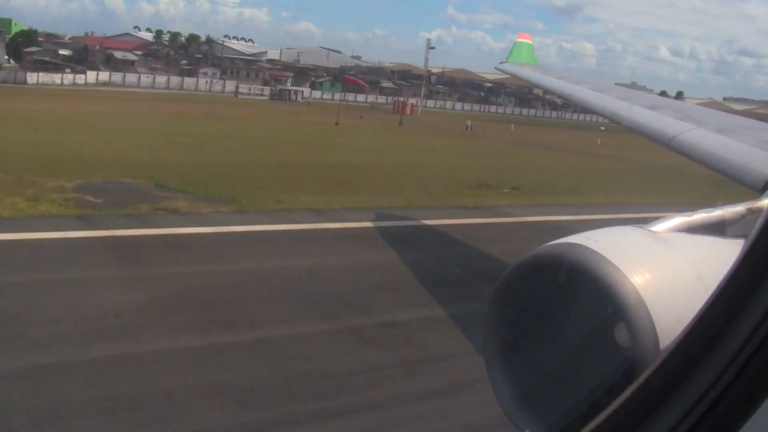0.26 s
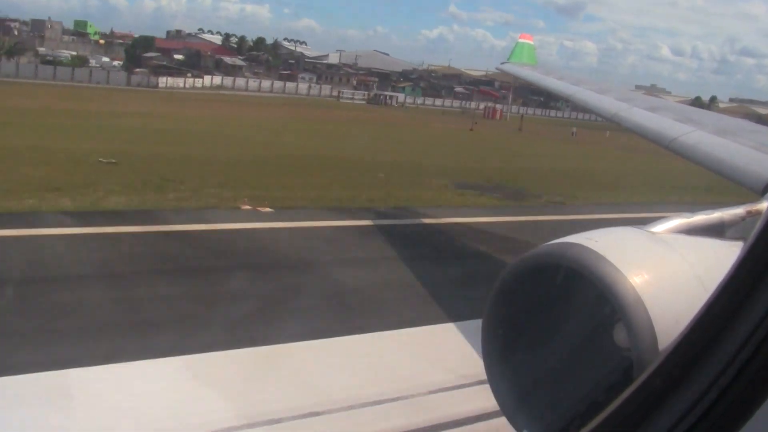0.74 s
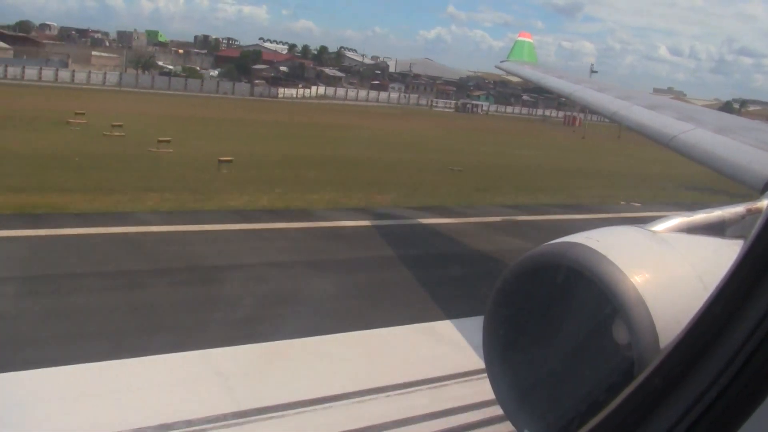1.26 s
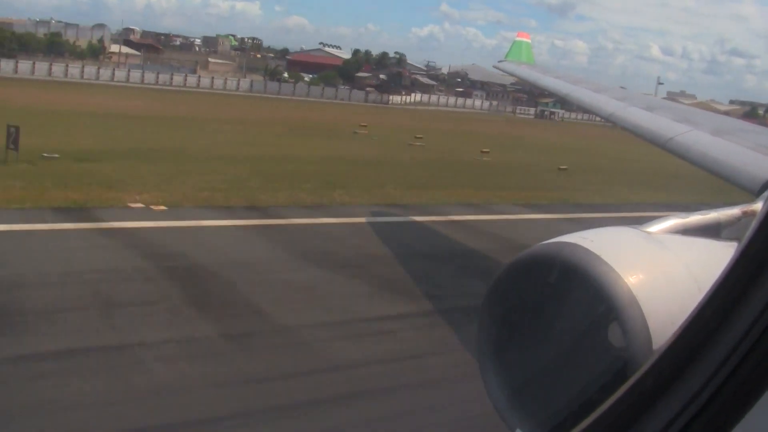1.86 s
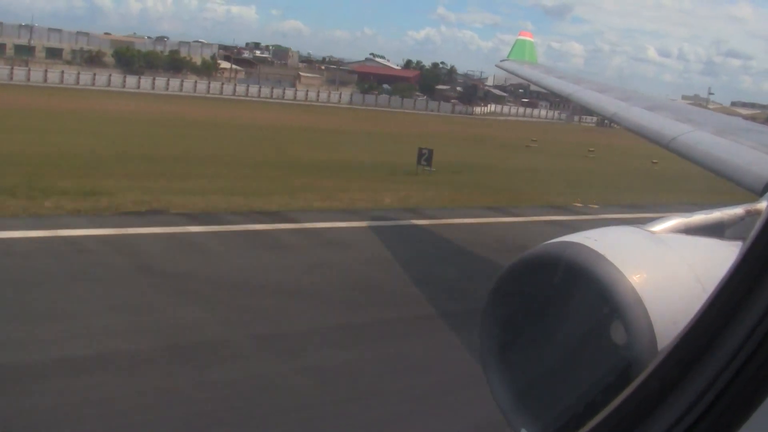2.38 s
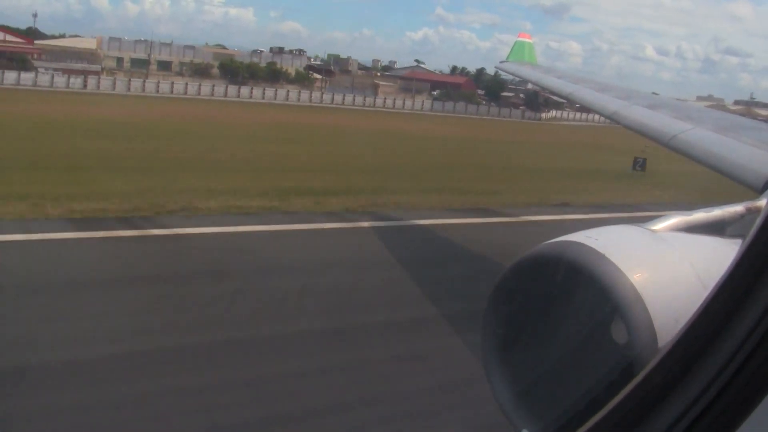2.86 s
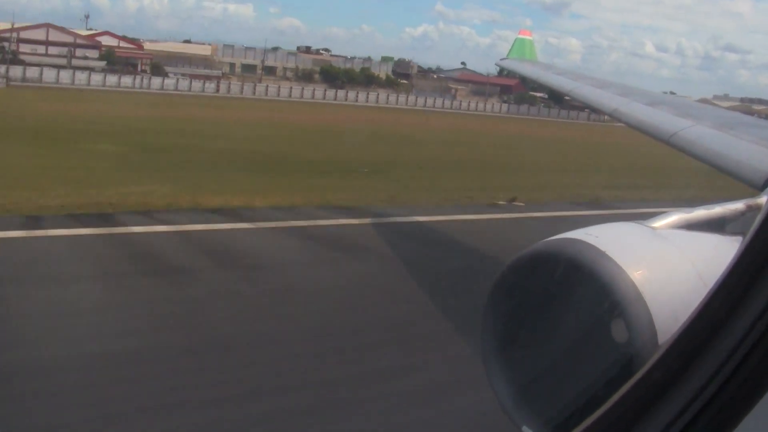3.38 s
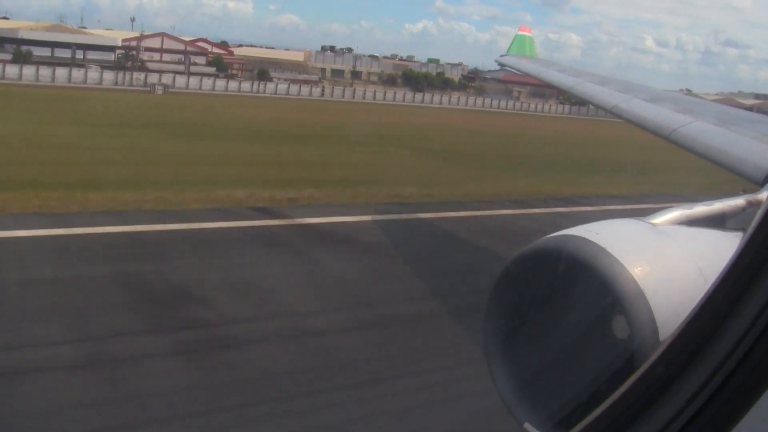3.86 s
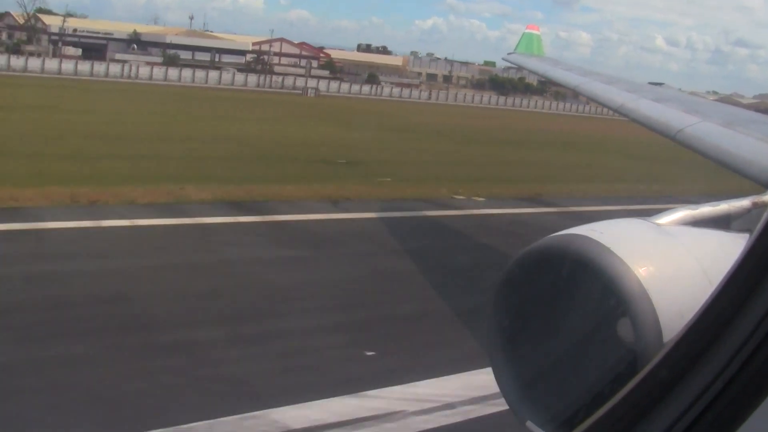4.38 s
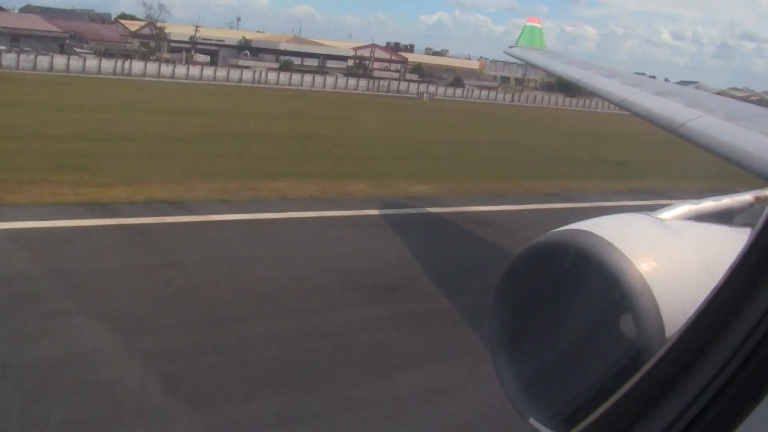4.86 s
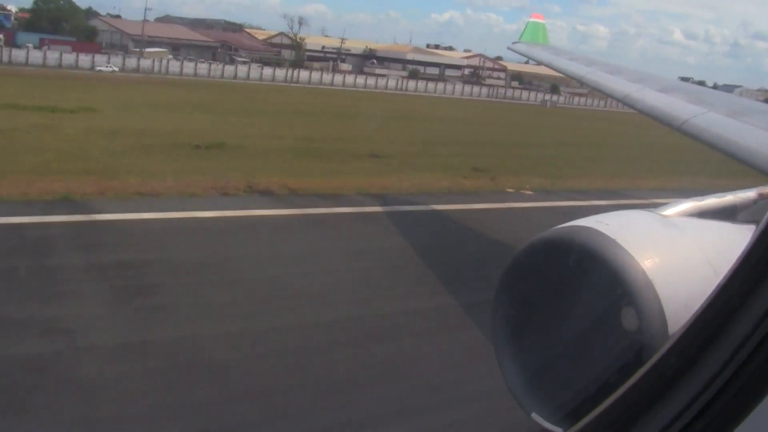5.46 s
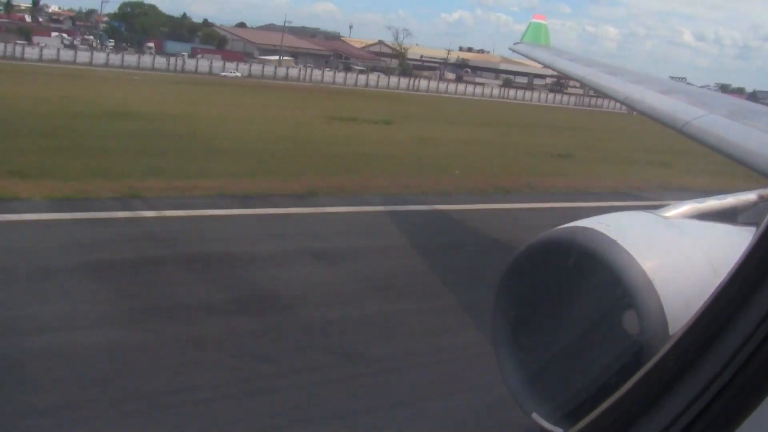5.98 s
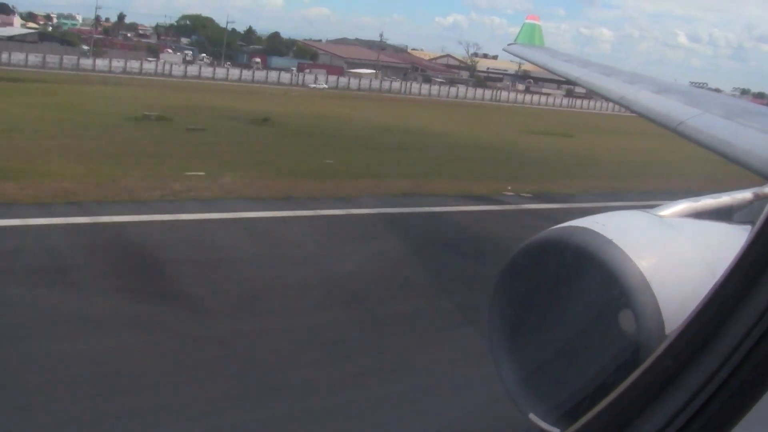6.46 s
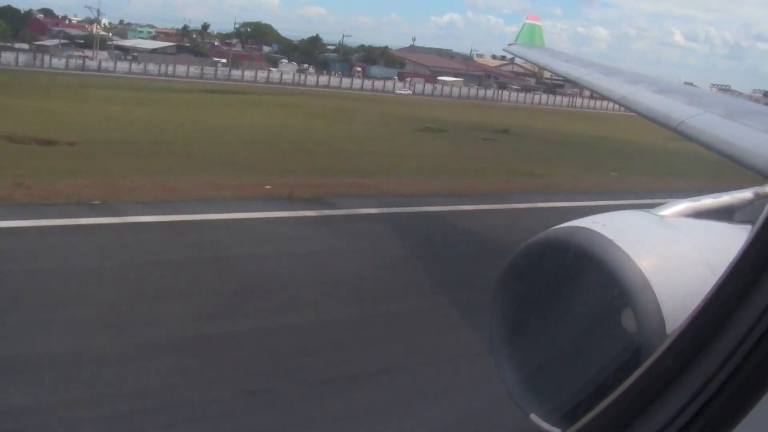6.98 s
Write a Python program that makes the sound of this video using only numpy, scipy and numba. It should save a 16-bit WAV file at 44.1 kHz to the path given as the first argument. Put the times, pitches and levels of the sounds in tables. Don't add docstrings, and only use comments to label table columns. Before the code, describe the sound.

Inside an airliner cabin on its take-off roll, jet engines roar and buzz through the wall while wheels drum and thump over runway bumps.

```python
import sys
import numpy as np
from scipy import signal
from scipy.fft import rfft, irfft, next_fast_len
from scipy.io import wavfile
from scipy.ndimage import uniform_filter1d
from numba import njit

SR = 44100
rng = np.random.default_rng(int(sys.argv[2]) if len(sys.argv) > 2 else 0)


def voltage_ratio(decibels):
    exponent = np.asarray(decibels, float) / 20
    return 10 ** exponent


def put_to_file(sound):
    columns = np.atleast_2d(sound).T
    safe = np.clip(columns, -1, 1)
    whole_steps = np.round(safe * 32767)
    wavfile.write(sys.argv[1], SR, whole_steps.astype(np.int16))


N = 318843
TIME = np.arange(N) / SR
SIZE = next_fast_len(N)
HZ = np.arange(SIZE // 2 + 1) * SR / SIZE

# f/Hz, level/dB
MIC_HISS = [(1000, -13.5), (6000, -2), (10000, -4), (13000, -15.5), (16000, -26.5)]
# f/Hz, level/dB
SIDE_LEVEL = [(25, -26), (60, -38), (110, -36), (200, -30.5), (380, -29), (700, -17), (1290, -20),
              (2200, -16), (3000, -21), (3900, -15), (4600, -31), (6000, -21), (7200, -11), (12000, -8)]
# f/Hz, level/dB, start t/s, end t/s
PUMPS = [
    (812.7, -37, 0, 7.4),
    (554, -28, 0, .7),
]
# t/s, peak level/dB, f/Hz, t60/s
TICKS = [
    (0.153, -49.5, 9500, .03),
    (0.619, -49.5, 10100, .03),
    (2.326, -55, 10040, 0.044),
    (2.748, -52.5, 9800, 0.053),
    (2.76, -46, 5600, 0.048),
    (4.91, -36, 4430, .04),
    (4.924, -44, 9330, 0.019),
    (5.954, -53, 7500, .01),
    (4.025, -66, 10800, .03),
    (0.023, -38, 1960, 0.014),
]
# t/s, peak level/dB, f/Hz, length/s
SQUEAKS = [
    (0.143, -47.5, 6100, 0.068),
    (4.822, -51, 6170, 0.033),
    (5.172, -43.5, 6220, .035),
    (5.692, -42, 6200, .035),
    (6.017, -54, 6000, .025),
]
# t/s, peak level/dB, t60/s
SCRAPES = [
    (4.924, -28.5, .08),
    (5.222, -36, .05),
]
# t/s, engine level/dB, whine level/dB
CABIN = [(0, -2, -34), (.3, 3, -36), (.64, -0.5, -34.5), (.8, 3.5, -32.5), (1.35, 3.5, -30.5),
         (1.7, 3.5, -35.5), (1.9, 1.5, -30.5), (2.3, 1.5, -31.5), (2.6, 1.5, -32.5), (3.3, 2, -31),
         (4.05, 2.5, -31), (4.4, -2, -34.5), (4.95, -1, -44.5), (5.4, -1, -39.5), (5.9, -0.5, -38),
         (6.17, -3, -33.5), (6.7, -1.5, -42.5), (7.0, 1, -30.5)]
# t/s, depth level/dB, length/s
WHINE_FADES = [(.01, 5.5, 0.051), (.35, 7.5, 0.084), (.64, 13, 0.12), (1.2, 6.5, .05), (1.5, 8.5, 0.06),
               (1.69, 7.5, .18), (2.1, 15, 0.061), (2.43, 4.5, .1), (2.7, 5.5, 0.11), (3.04, 3, 0.06),
               (3.43, 5.5, 0.073), (3.67, 10.5, 0.047), (3.74, 9, 0.042), (3.88, 1, .06), (4.47, 5.5, .08),
               (4.71, 12.5, 0.11), (4.97, 9.5, .08), (5.24, 5, 0.13), (5.53, 7, .08), (5.76, 12, .14),
               (5.99, 7, 0.065), (6.29, 13, 0.1), (6.5, 17, 0.072), (6.9, 2, .04), (7.0, 2, 0.036)]
# multiple of the shaft turn, level/dB
BUZZ = [(5, -28.5), (7, -34.5), (16, -63), (21, -49), (22, -56), (25, -57), (26, -52.5), (27, -62.5),
        (29, -49.5), (30, -59.5), (31, -56.5), (32, -67.5), (34, -36), (37, -51.5), (38, -59.5),
        (39, -45.5), (40, -50), (42, -57), (44, -57.5), (45, -74), (46, -60), (47, -59), (59, -66),
        (60, -64.5), (68, -52), (73, -62.5), (102, -63), (136, -73.5)]
# t/s, floor thump level/dB, camera gain drop level/dB
BUMPS = [(.1, 1.5, 1.5), (0.334, 2.5, 3.5), (.575, 0, 2.5), (.842, -1, 4), (1.024, 2, 3), (1.178, 3, 0),
         (1.488, 6, 4), (1.605, 0, 6), (1.675, -1, 3), (2.065, 1, 4.5), (2.417, 1.5, 3.5), (2.526, 3.5, 3),
         (2.631, 3, 2), (2.775, 2, 3.5), (2.911, 0.5, 6), (3.19, 0.5, 5), (3.368, 2, 3), (3.426, 1.5, 4),
         (3.687, 6.5, 6), (3.839, 5, 3), (4.261, -0.5, 2), (4.414, 5, 2.5), (4.677, 10, 8.5), (4.944, 9, 7),
         (5.204, 9.5, 4.5), (5.48, 3.5, 2), (5.708, 5, 5), (5.959, 7.5, 6), (6.205, 9, 5), (6.458, 8, 6.5)]
# t/s, depth level/dB, length/s
LULLS = [(0.647, 13, 0.05), (0.866, 9.6, 0.058), (0.997, 12.5, 0.026), (1.113, 6.5, 0.055),
         (1.33, 14.5, 0.061), (1.692, 8.5, 0.041), (1.757, 5, 0.04), (2.3, 8.5, 0.043), (2.452, 4.5, 0.034),
         (2.743, -2.5, 0.05), (2.937, 12, 0.034), (3.276, 6.5, 0.061), (3.502, 5, 0.028), (3.706, 5, 0.055),
         (3.774, 9.5, 0.064), (3.916, 10.5, 0.05), (4.211, 9, 0.037), (4.38, 2, 0.045), (4.513, 4.5, 0.058),
         (4.8, 10, 0.087), (5.008, 9, 0.037), (5.172, 6.5, 0.017), (5.356, 4, 0.055), (5.42, 6.9, 0.03),
         (5.516, 10.5, 0.04), (6.027, 3.5, 0.055), (6.183, 5, 0.044), (6.3, 7.5, 0.046), (6.546, 2, 0.064),
         (6.857, 4, 0.022)]
# t/s, turns per s
WHEEL_TURNS = [(0, 14.7), (7.23, 19.5)]
# multiple of the wheel turn, level/dB off the floor modes
WHEEL_ORDERS = [(5, -21), (6, -24), (7, -25.5), (8, -25.5)]
# f/Hz, width f/Hz, level/dB
DRUM_MODE = [(115.8, 11.5, 13.5)]
# f/Hz, width f/Hz, level/dB
FLOOR_MODES = [(81.5, 120, -9), (113.7, 16, -7)]
# f/Hz, level/dB per Hz
ROAR = [(12, -63), (20, -28.5), (85, -6.5), (126, -4), (175, -3), (289, -8.5), (746, -25), (811, -25.5),
        (1300, -33.5), (1770, -35.5), (1920, -32), (2470, -45), (5850, -53), (9930, -63), (15500, -92)]
# f/Hz, width f/Hz, level/dB
WALL_MODES = [(226, 13, 4), (2190, 300, -2), (3520, 1000, 3), (5690, 650, 4), (7500, 500, 1)]

SHAFT_HZ, BLADES = 56.23, 34
SCRAPE_HZ = 900, 2600
THUMP_PEAK_S, THUMP_LENGTH_S = 0.022, 0.055
GAIN_DROP_S, GAIN_RECOVER_S = 0.009, 0.11
SHUDDER_SHARE, SHUDDER_S = 0.35, 0.012
HISS_FOLLOWS = 0.65
ROAR_DUCKS, WHINE_DUCKS, FLOOR_DUCKS = 1, 0.52, 0.68
GAIN_FLUTTER_DB, FLOOR_FLUTTER_DB, WHINE_FLUTTER_DB = 1.22, 1.5, 1.6


def level(x, db):
    return x * voltage_ratio(db) / np.sqrt(np.mean(x ** 2))


def curves(table):
    s, *columns = np.transpose(table)
    return [np.interp(TIME, s, c) for c in columns]


def shape(table, hz):
    f, db = np.transpose(table)
    return np.interp(np.log(hz + 1), np.log(f), db)


def resonances(modes, hz):
    return sum(height / (1 + (2 * (hz - f) / width) ** 2) for f, width, height in modes)


def walk(rate):
    hold = max(int(SR / rate), 2)
    steps = np.repeat(rng.standard_normal(N // 20 + 2)[:N // hold + 1], hold)
    return 1.25 * uniform_filter1d(uniform_filter1d(steps, hold), hold)[:N]


def bell(s, length):
    return np.exp(-(2 * (TIME - s) / length) ** 2)


def dips(table):
    return -sum(db * bell(s, length) for s, db, length in table)


def swell(s, rise_s, fall_s):
    return np.exp(np.minimum((TIME - s) / rise_s, (s - TIME) / fall_s))


def pair(mid, side):
    return np.array([mid + side, mid - side])


def noise(db):
    mid, side = (rfft(rng.standard_normal(SIZE)) * voltage_ratio(db) for _ in range(2))
    return mid, side * voltage_ratio(shape(SIDE_LEVEL, HZ))


def heard(mid, side):
    return pair(irfft(mid, SIZE)[:N], irfft(side, SIZE)[:N])


def band_pass(x, order, edges_hz):
    return signal.sosfilt(signal.butter(order, edges_hz, "band", fs=SR, output="sos"), x)


def tone(phase, scatter, rate, side_db):
    turn = np.exp(1j * (phase + 2 * np.pi * rng.random()))
    paths = 1 + scatter * (walk(rate) + 1j * walk(rate))
    stray = voltage_ratio(side_db) * np.exp(1j * 2 * walk(rate / 8))
    return np.sqrt(2 / (1 + 2 * scatter ** 2)) * pair((turn * paths).real, (turn * stray).real)


def mic_hiss():
    spectrum = rfft(rng.standard_normal((2, SIZE))) * voltage_ratio(shape(MIC_HISS, HZ))
    return level(irfft(spectrum, SIZE)[:, :N], -67.0)


def pumps(gain_db):
    out = 0
    for hz, db, start, end in PUMPS:
        running = np.clip(np.minimum(TIME - start + 0.11, end - TIME) / 0.053, 0, 1)
        out = out + voltage_ratio(db + gain_db) * running * tone(2 * np.pi * hz * TIME, 0.19, 4., -19.5)
    return out


def ticks():
    out = np.zeros(N)
    for s, db, hz, t60 in TICKS:
        age = np.clip(TIME - s, 0, None)
        edges = np.minimum([hz * 1.1, hz * 1.2], .45 * SR)
        ring = level(band_pass(rng.standard_normal(N), 2, edges), 0)
        attack = np.minimum(age / 0.00082, 1)
        out += attack * voltage_ratio(db - 60 * age / t60) * ring
    return pair(out, .2 * out)


def squeaks():
    out = np.zeros(N)
    for s, db, hz, length in SQUEAKS:
        phase = 2 * np.pi * hz * np.cumsum(1 + 0.0098 * walk(160)) / SR
        out += voltage_ratio(db) * bell(s, length) * (np.sin(phase) + .05 * np.sin(2 * phase))
    return pair(out, .2 * out)


def scrapes():
    grit = band_pass(rng.standard_normal(N), 1, SCRAPE_HZ)
    grit = level(signal.sosfilt(signal.butter(3, 7000, fs=SR, output="sos"), grit), 0)
    puffs = sum(voltage_ratio(db) * swell(s, .002, t60 / np.log(1000)) for s, db, t60 in SCRAPES)
    out = puffs * grit
    return pair(out, .1 * out)


def fan(whine_db, hiss_db):
    phase = 2 * np.pi * SHAFT_HZ * np.cumsum(1 + 0.000821 * walk(3)) / SR
    out = 0
    for k, db in BUZZ:
        if k == BLADES:
            out = out + voltage_ratio(whine_db - .5) * tone(k * phase, .22, 70., -9)
        else:
            out = out + voltage_ratio(db + hiss_db) * tone(k * phase, .15 + .025 * k, 5 + 1.3 * k, -15)
    return out


def runway():
    thump_db = -dips([(s + THUMP_PEAK_S, db, THUMP_LENGTH_S) for s, db, _ in BUMPS])
    duck_db = 0
    for s, _, db in BUMPS:
        shudder = SHUDDER_SHARE * swell(s, SHUDDER_S, GAIN_DROP_S)
        drop = swell(s + GAIN_DROP_S, GAIN_DROP_S, GAIN_RECOVER_S)
        duck_db = duck_db + db * (shudder - drop)
    return thump_db + dips(LULLS), duck_db - duck_db.mean()


def floor(boom_db):
    (turns,) = curves(WHEEL_TURNS)
    phase = 2 * np.pi * np.cumsum(turns) / SR
    drum = 0
    for k, db in WHEEL_ORDERS:
        drum_db = db + resonances(DRUM_MODE, k * turns) + 2.5 * walk(2.5)
        drum = drum + voltage_ratio(drum_db) * tone(k * phase, .3, 5., -29)
    drum = drum + resonances([(79, 10, voltage_ratio(-20))], 4 * turns) * tone(4 * phase, .3, 4., -38)
    modes = resonances([(f, width, voltage_ratio(db)) for f, width, db in FLOOR_MODES], HZ)
    rumble = level(heard(*noise(40 * np.log10(modes))), -19)
    both = drum + rumble
    power = uniform_filter1d(uniform_filter1d(both[0] ** 2, size=1800), size=1800)
    beats = np.sqrt(power + 1e-4)
    return level(both / beats ** 1.21 * voltage_ratio(boom_db), -10.5)


def roar(low_db, hiss_db):
    mid, side = noise(shape(ROAR, HZ) + resonances(WALL_MODES, HZ))
    out, octave = 0, np.log2(HZ + 1)
    for centre in np.arange(4, 15, 1.):
        band = np.clip(1 - abs(octave - centre), 0, 1)
        hiss_share = np.clip((centre - 8.5) / 1.8, 0, 1)
        db = (1 - hiss_share) * low_db + hiss_share * hiss_db + 0.59 * walk(8.2)
        out = out + voltage_ratio(db) * heard(mid * band, side * band)
    return level(out, -12.3)


def scene():
    engine_db, whine_db = curves(CABIN)
    boom_db, duck_db = runway()
    engine_db = engine_db - engine_db.mean()
    hiss_db = HISS_FOLLOWS * engine_db + duck_db + GAIN_FLUTTER_DB * walk(30.)
    low_db = engine_db + ROAR_DUCKS * duck_db
    whine_db = whine_db + dips(WHINE_FADES) + WHINE_DUCKS * duck_db + WHINE_FLUTTER_DB * walk(45.)
    boom_db = boom_db + FLOOR_DUCKS * duck_db + FLOOR_FLUTTER_DB * walk(25.)
    cabin = pumps(.5 * hiss_db + 0.87 * low_db) + ticks() + squeaks() + scrapes()
    return cabin + fan(whine_db, hiss_db) + floor(boom_db) + roar(low_db, hiss_db)


@njit
def limit(x, top, step, release):
    gain, e = np.empty(len(x)), top
    for i in range(len(x)):
        e = x[i] * (1 + step) if x[i] > e else e + (top - e) * release
        gain[i] = top / e
    return gain


def low_pass(x):
    return signal.sosfilt(signal.butter(12, 15740, fs=SR, output="sos"), x)


def record(dry):
    held = dry * limit(np.abs(dry).max(axis=0), .895, .007, .0007)
    return low_pass(held + mic_hiss())


dry = scene()
out = record(dry)
put_to_file(out)
```